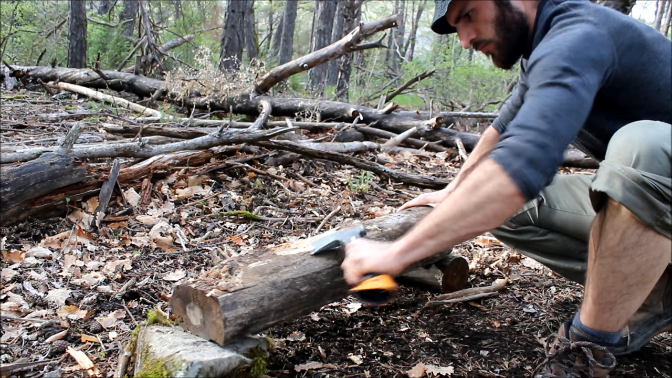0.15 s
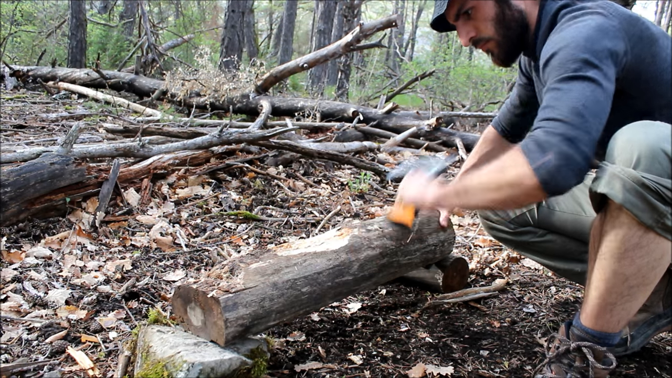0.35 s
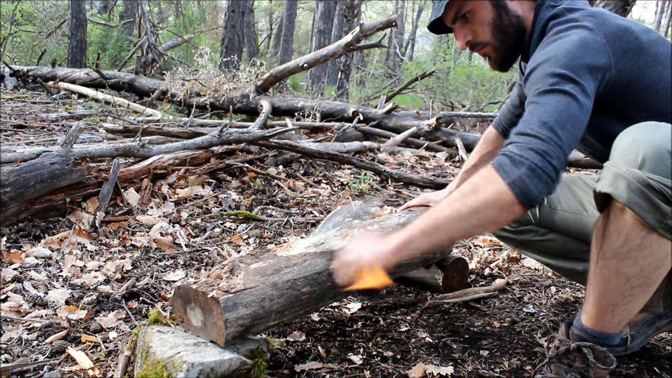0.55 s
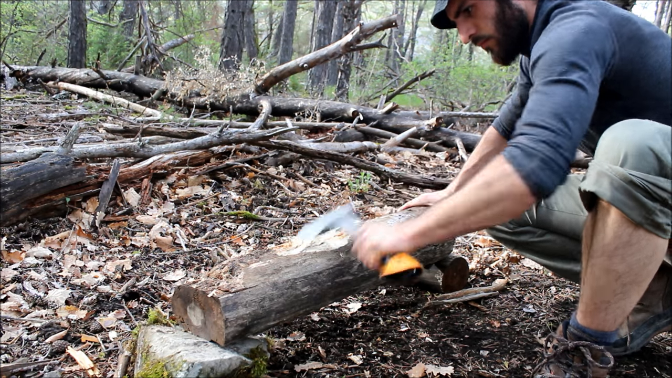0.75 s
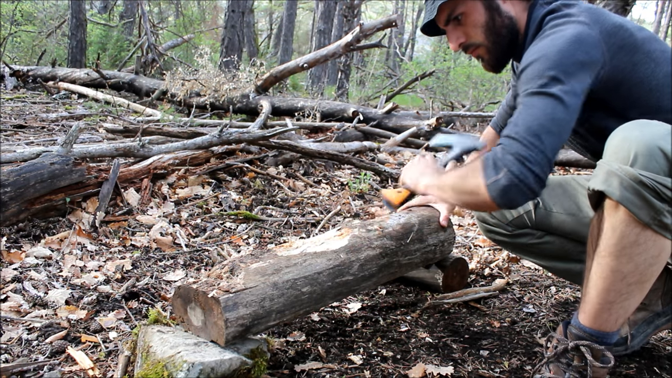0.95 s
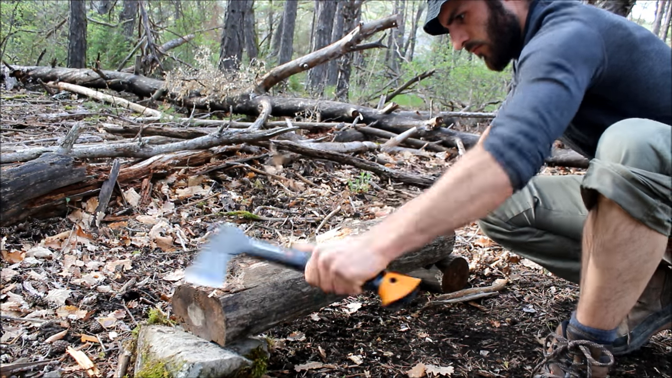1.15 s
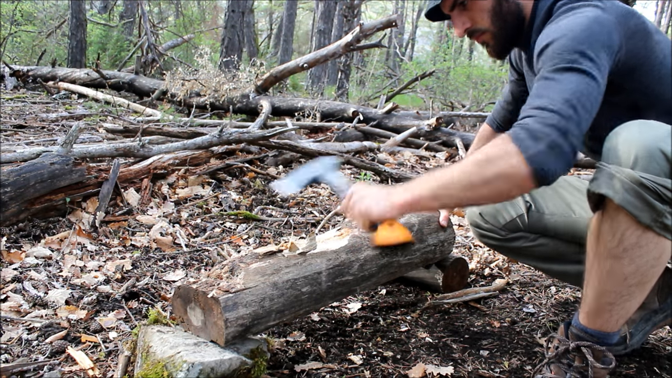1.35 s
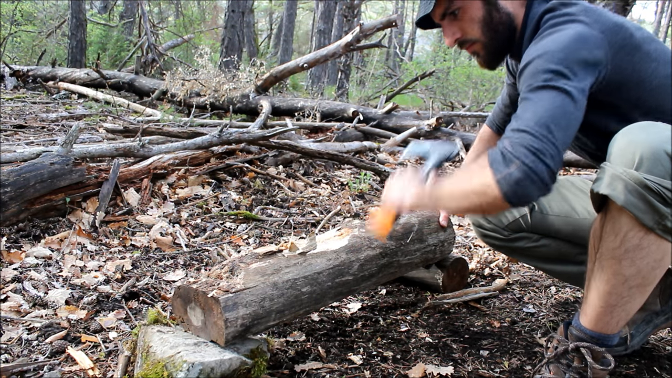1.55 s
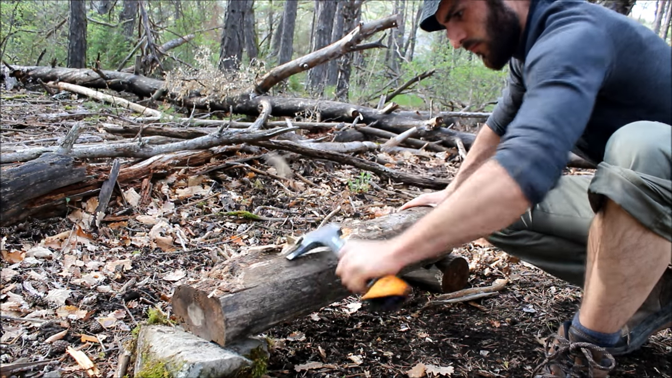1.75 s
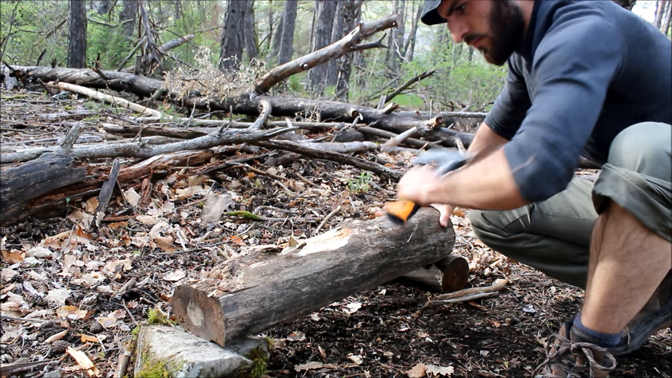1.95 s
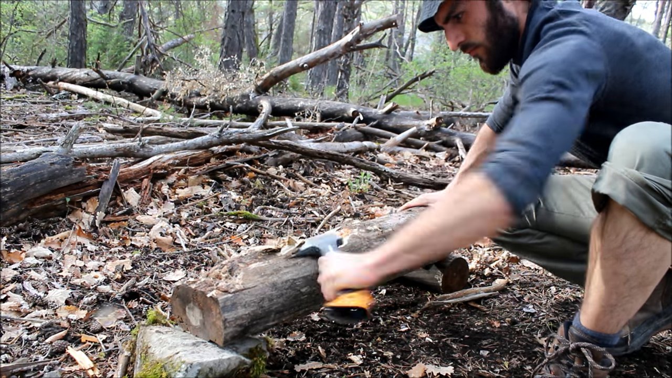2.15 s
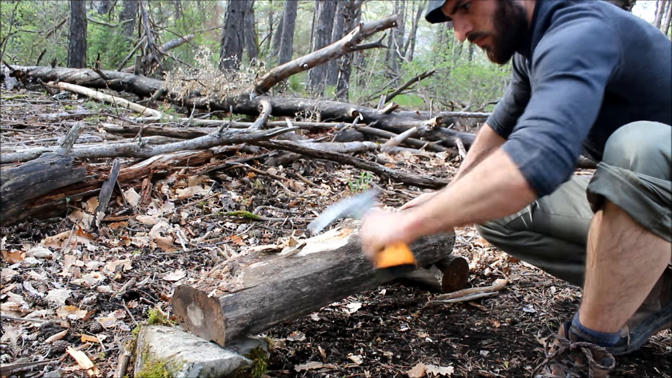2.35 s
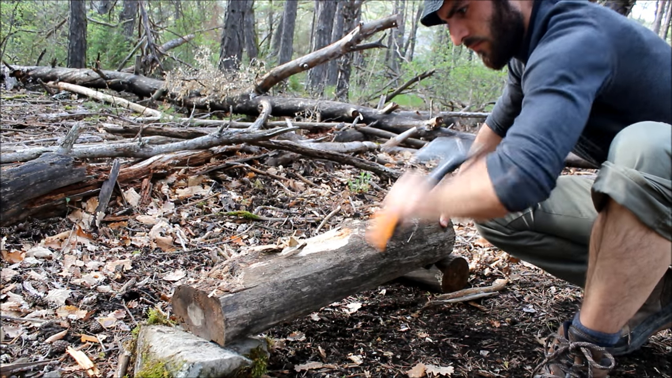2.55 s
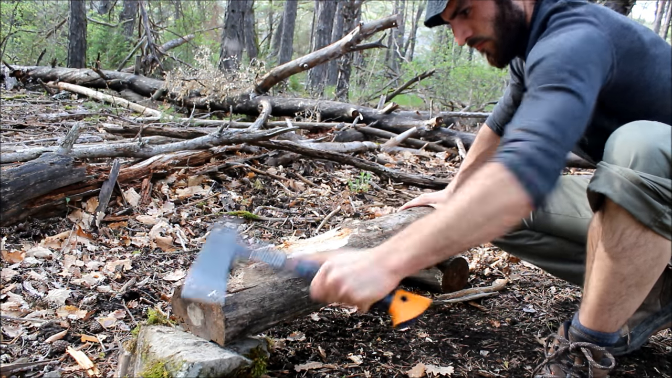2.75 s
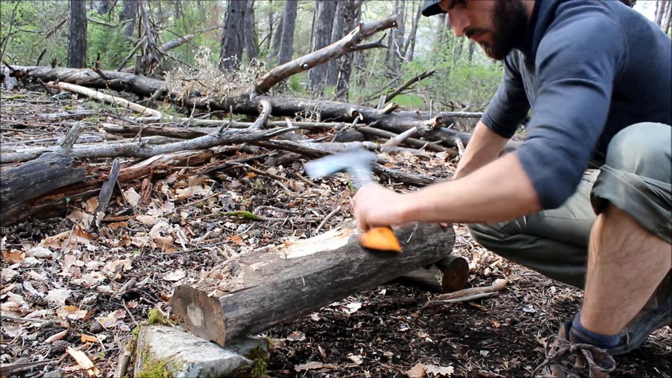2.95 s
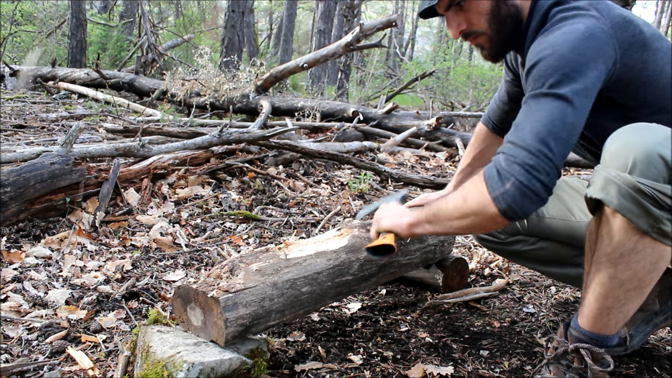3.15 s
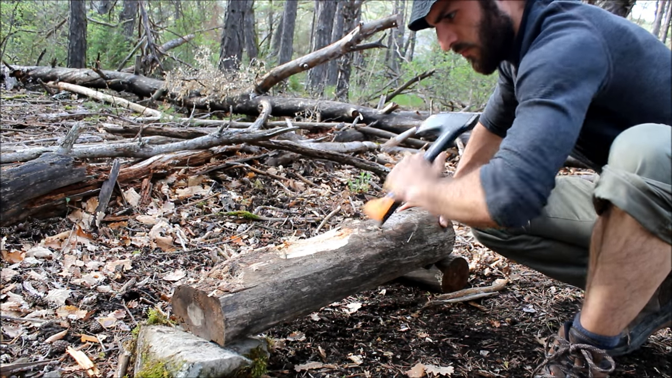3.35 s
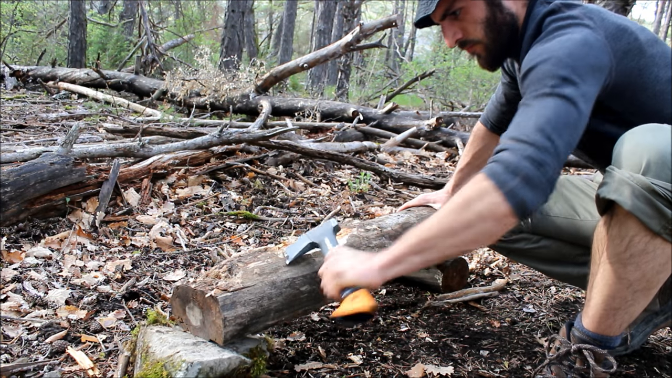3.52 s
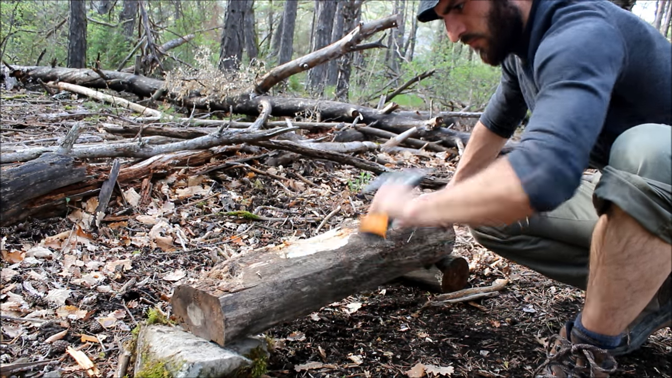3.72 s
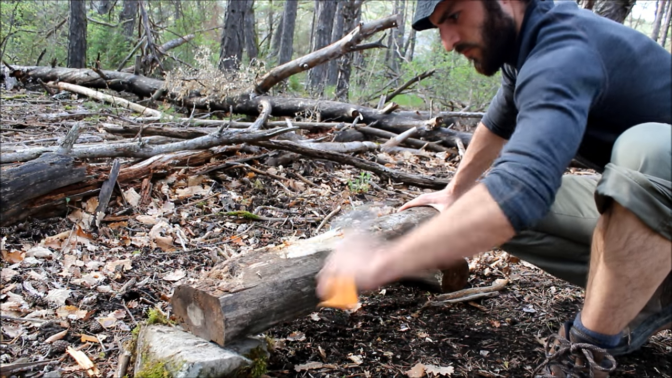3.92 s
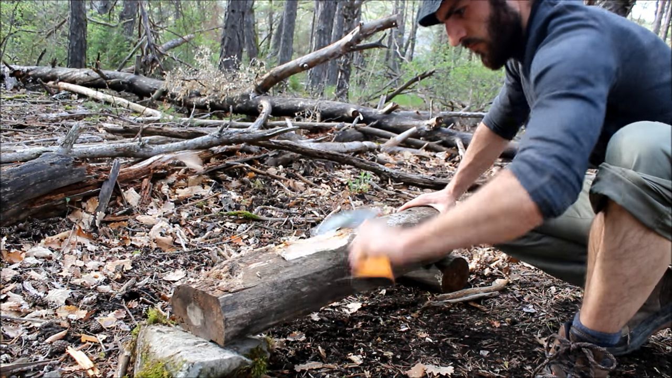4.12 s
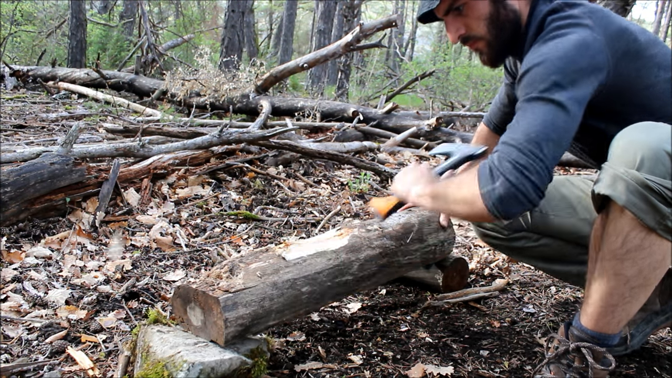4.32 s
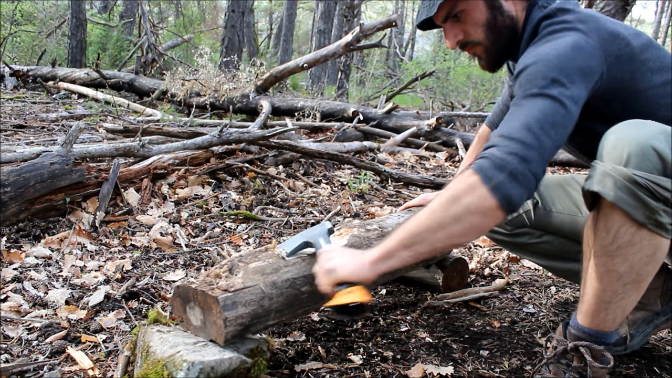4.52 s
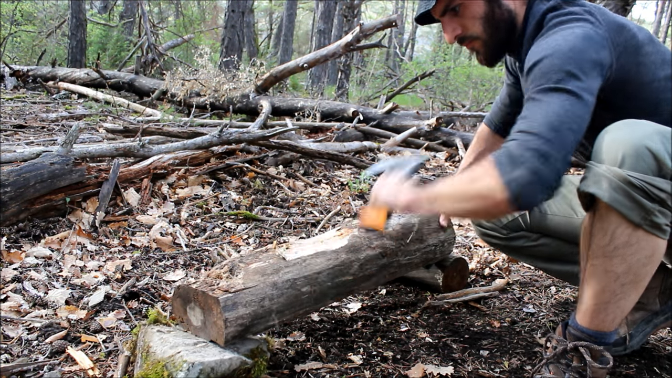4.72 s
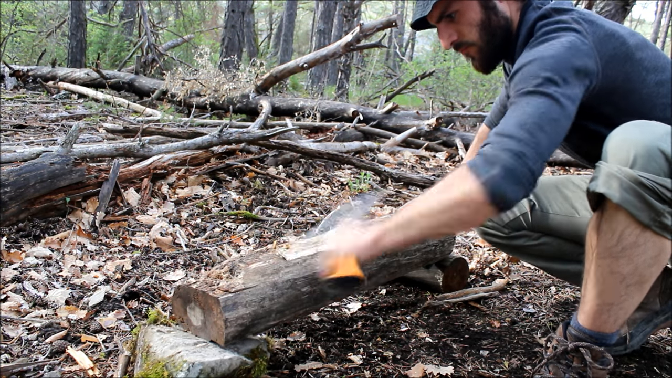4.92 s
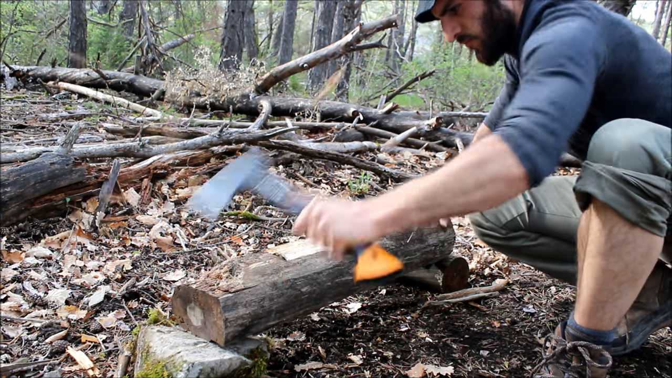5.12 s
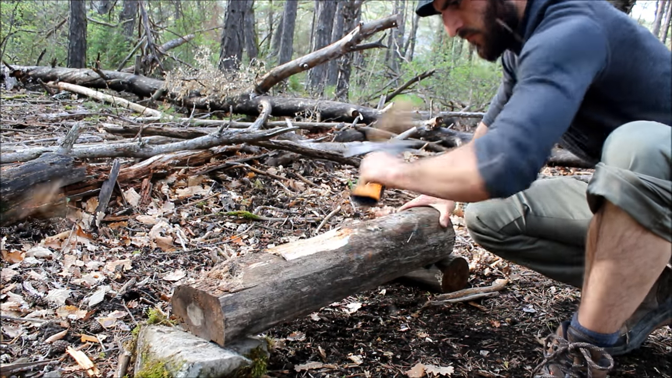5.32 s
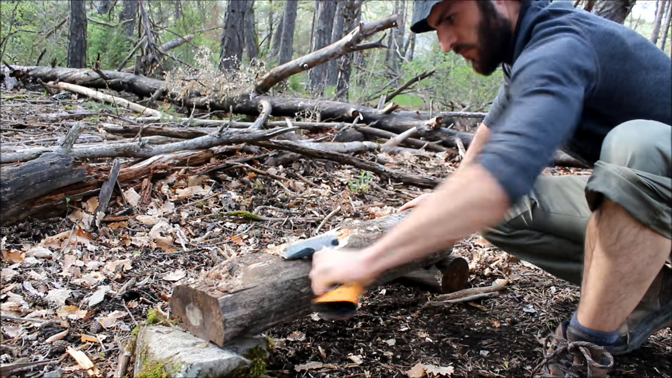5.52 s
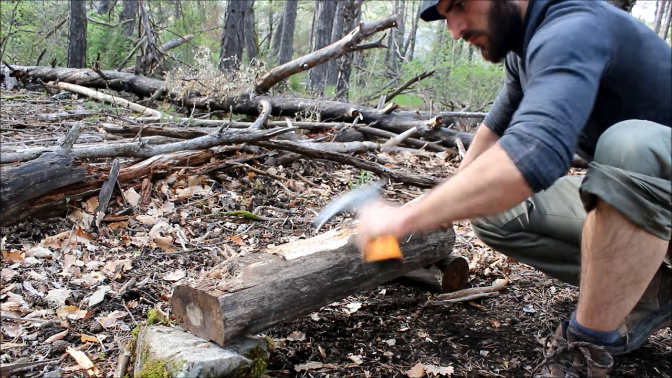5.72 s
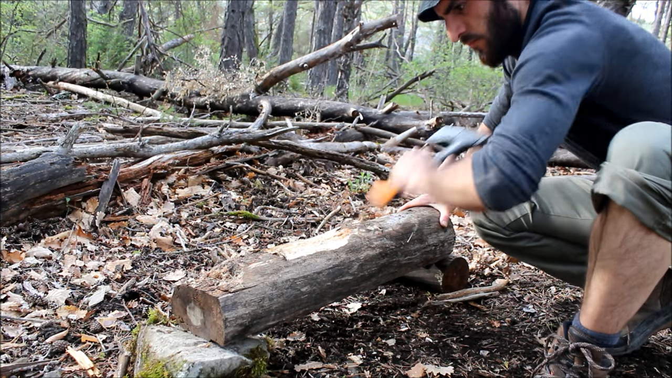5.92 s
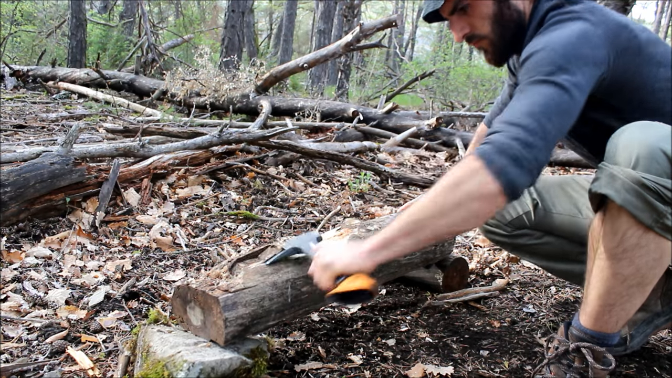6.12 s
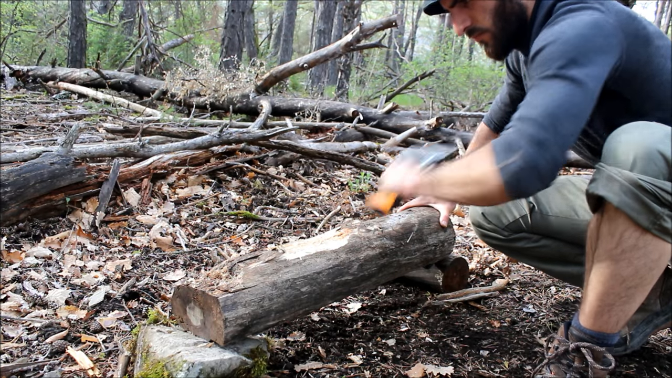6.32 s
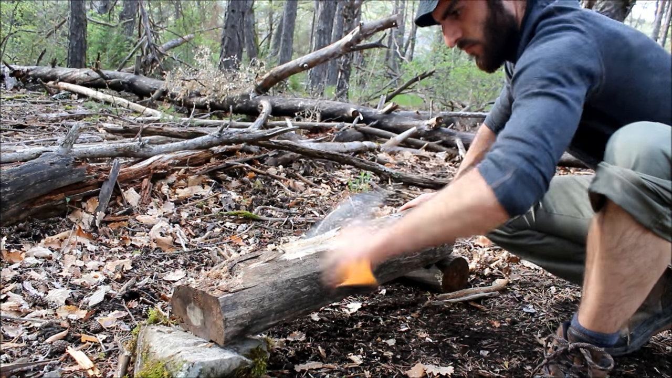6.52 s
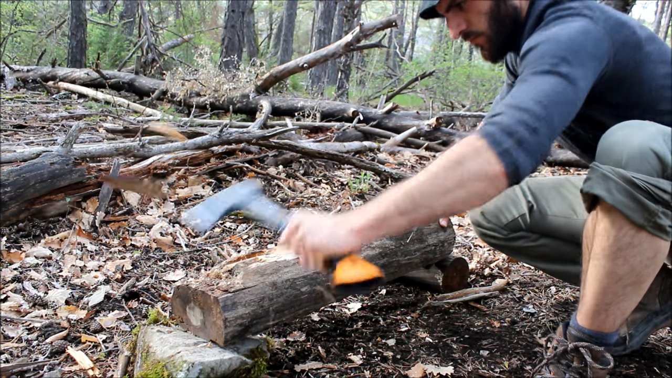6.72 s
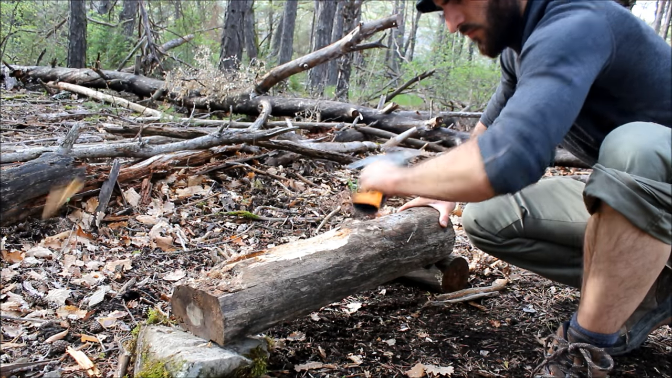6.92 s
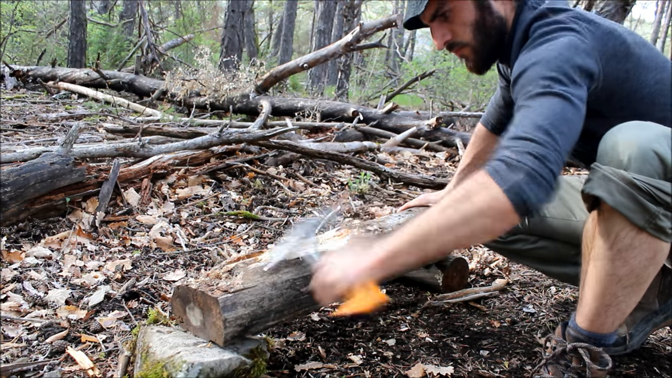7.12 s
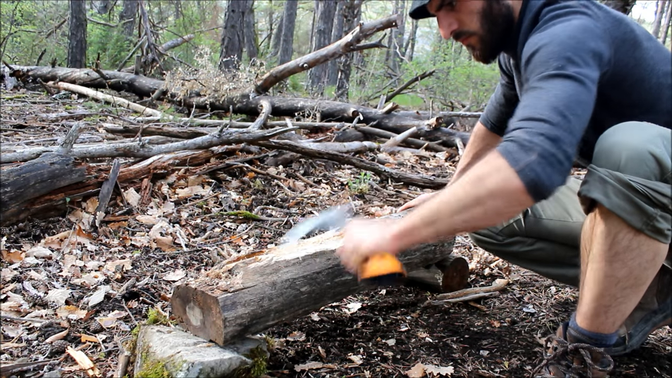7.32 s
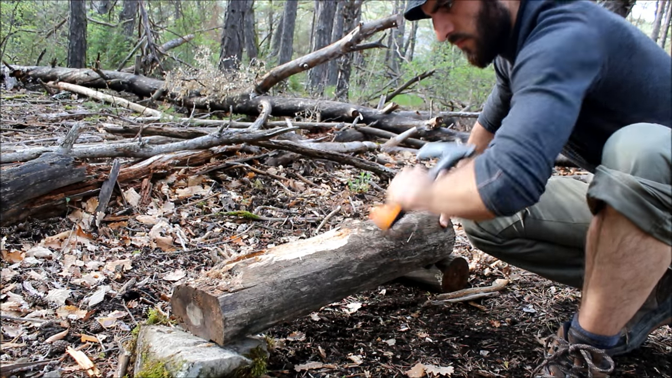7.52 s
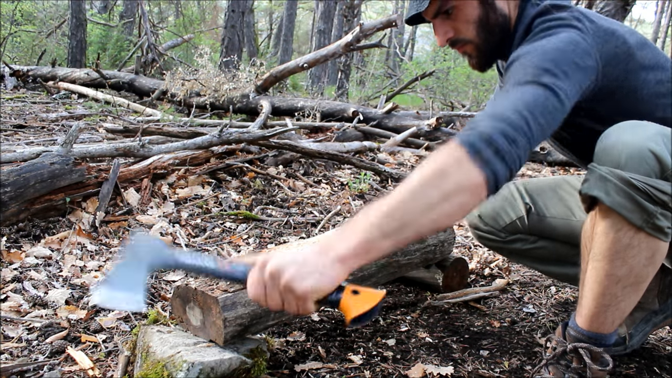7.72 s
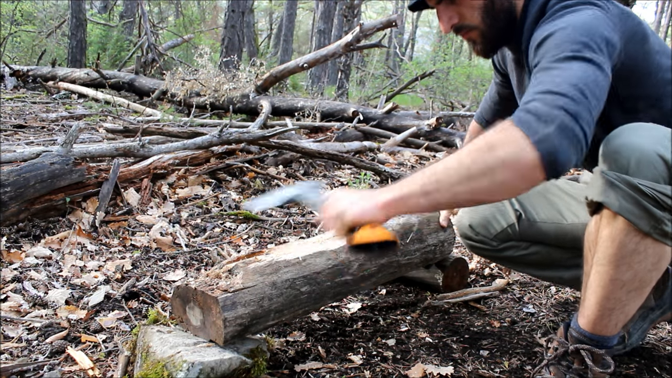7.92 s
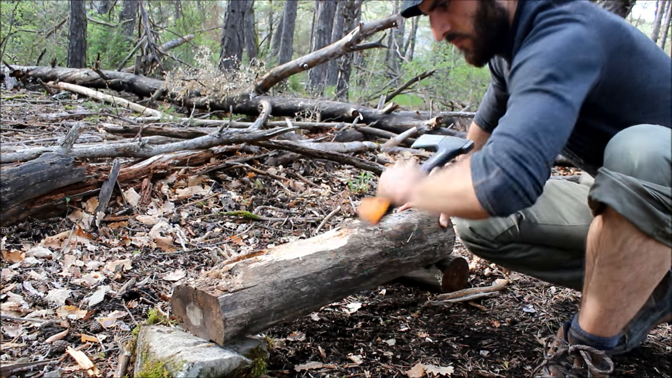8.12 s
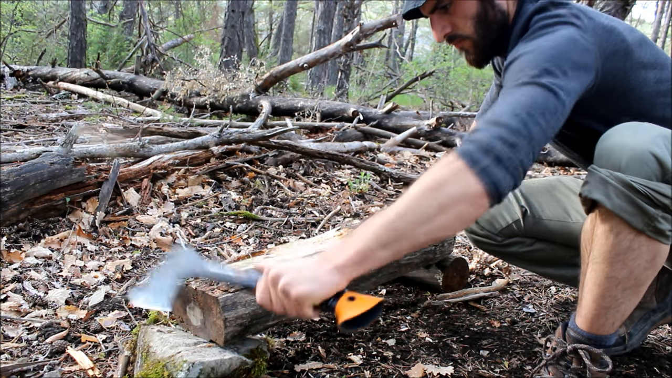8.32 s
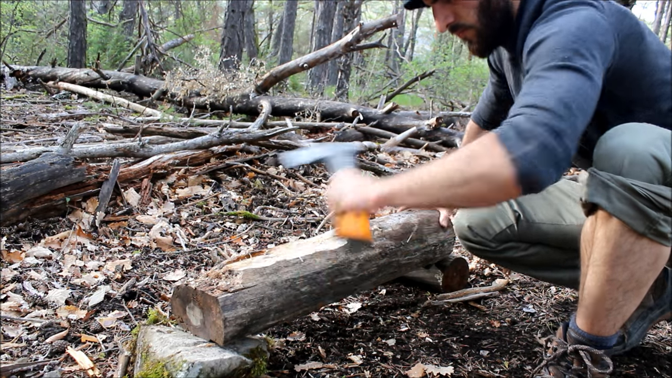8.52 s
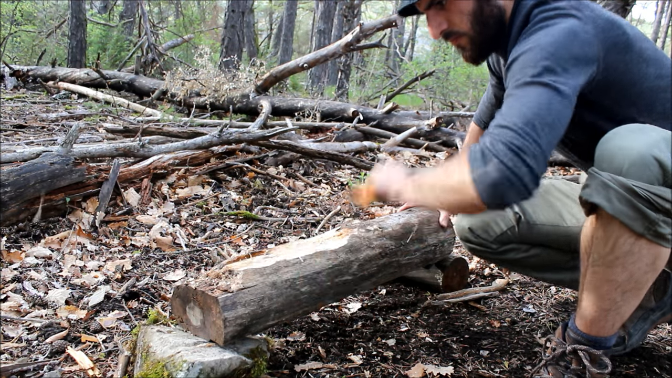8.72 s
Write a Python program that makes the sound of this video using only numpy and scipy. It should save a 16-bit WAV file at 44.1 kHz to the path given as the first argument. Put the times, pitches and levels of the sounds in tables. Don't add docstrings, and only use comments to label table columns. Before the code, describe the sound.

Outdoors in a wood, light wind bumps softly on a nearby microphone while a hatchet pares a log. Sixteen sharp, clipped knocks follow at roughly half-second spacing, some slightly doubled as the edge rebites. Short hollow wood tones and scattered tree echoes trail them. Chips tick, ping and rustle in dry leaves, busiest near three, five and a half and seven seconds.

```python
import sys
import numpy as np
from scipy import signal
from scipy.fft import rfft, irfft
from scipy.io import wavfile
from scipy.ndimage import uniform_filter1d

SR = 44100
rng = np.random.default_rng(int(sys.argv[2]) if len(sys.argv) > 2 else 0)


def to_wav(sig):
    pcm = np.clip(np.atleast_2d(sig), -1, 1) * 32767
    pcm = np.round(pcm).astype(np.int16)
    wavfile.write(sys.argv[1], SR, pcm.T)


def gain_from_db(level_db):
    decades = np.asarray(level_db, float) / 20
    return 10 ** decades


N = 386316

# start in seconds, strength in dB, knock in Hz,
# pitch as the edge bites in Hz, long log ring in dB.
BLOWS = [(0.1264, 11.5, 560, 1200, -24.5), (0.6091, 4.5, 676, 1170, -37), (1.1146, 7, 570, 1260, -36),
         (1.6845, 13, 670, 1140, -23), (2.182, 9.5, 717, 1460, -48), (2.6713, 11.5, 600, 1220, -26.5),
         (3.5087, -1, 420, 1050, -23.5), (3.9735, 1.5, 642, 1060, -27.5), (4.4757, -6, 900, 1150, -28.5),
         (4.9739, 5, 560, 1250, -24.5), (5.5428, 9, 620, 1150, -25.5), (6.0595, 8, 720, 1170, -29),
         (6.5763, 6.5, 653.5, 1210, -29.5), (7.1672, -8, 500, 800, -29.5), (7.6579, 14.5, 570, 1400, -20),
         (8.2736, -3, 410, 520, -24.5)]
# fibre tear in dB, tear t60 in seconds, steel ring in dB, # thump of the log
# in dB, further log modes in dB.
CUTS = [(-8.5, .033, -15.5, -21, 7), (-5, .05, -10, -17, 4), (-12, .07, -8, -18, 0.5),
        (-14, .07, -28, -16, 9.5), (-7.5, .045, -3.5, -20, 10), (-9.5, .065, -20.5, -11.5, 11),
        (-8.5, .04, -4, -4, 7.5), (-14, .1, -13, -12, 3.5), (-3, .032, -14, -4, 7), (-3, .06, -12, -14, 3),
        (-8, .046, -21, -10, 8), (-14, .1, -28, -7, 11), (-19, .14, -24, -14, 5.5),
        (-6.5, .033, -12, -8, -3), (-19, .07, -29, -6, 14), (-12.5, .052, -34.5, -5, 3)]
STEEL_HZ = 3093


def rms_one(x):
    return x / np.sqrt(np.mean(x ** 2) + 1e-20)


def coloured(x, spectrum):
    hz = np.maximum(np.arange(len(x) // 2 + 1) * SR / len(x), 1)
    points = np.array(spectrum)
    gain = gain_from_db(np.interp(np.log(hz), np.log(points[:, 0]), points[:, 1]))
    return rms_one(irfft(rfft(x) * gain, len(x)))


def crackle(size, per_s, spread_db):
    out = np.zeros(size)
    at = rng.integers(0, size, round(size * per_s / SR))
    uneven = gain_from_db(spread_db * np.minimum(rng.exponential(1, len(at)), 4))
    out[at] = uneven * rng.standard_normal(len(at))
    return out


def sine(hz, t):
    return np.sin(2 * np.pi * hz * t)


def dying(t, t60, rise_s):
    return (1 - np.exp(-t / rise_s)) * gain_from_db(-60 * t / np.maximum(t60, .002))


def add(out, s, piece):
    i = round(s * SR)
    out[i:i + len(piece)] += piece[:N - i]


def wind():
    # time in seconds, level in dB.
    wind_level = [(0.0, -77), (0.27, -71), (4.42, -77.5), (6.0, -70.5), (6.95, -79.5), (7.73, -74),
                  (8.76, -84)]
    # centre in seconds, peak in dB.
    puffs = [(0.203, -53), (1.274, -60), (1.321, -41), (1.412, -45.5), (1.646, -54), (2.872, -59),
             (3.583, -42), (4.439, -54.5), (4.551, -52), (5.245, -60), (5.259, -51.5), (5.483, -66),
             (5.504, -51.5), (5.628, -48), (6.16, -66), (7.62, -67), (7.743, -54), (8.243, -61.5)]
    s, db = np.transpose(wind_level)
    lumps = coloured(rng.standard_normal(N), [(4, 17.5), (14, 10.5), (40, -36.5)])
    rumble = coloured(rng.standard_normal(N), [(14, -42.5), (45, 9.0), (80, 1), (160, -2), (400, -37)])
    out = gain_from_db(np.interp(np.arange(N) / SR, s, db) + 2.5 * lumps) * rumble
    t = np.arange(-.025, .025, 1 / SR)
    thump = np.sin(2 * np.pi * 85 * t + .4) * np.exp(-(t / .007) ** 2)
    for s, db in puffs:
        add(out, s - .025, gain_from_db(db) * thump)
    return out


def air():
    # frequency in Hz, level in dB per Hz.
    hush = [(35, -22.5), (60, -2), (118, 5.5), (1020, 1), (4960, -8.5), (7720, -12), (14500, -19.5),
            (15500, -14.5)]
    return gain_from_db(-60.5) * coloured(rng.standard_normal(N), hush)


def whine():
    # frequency in Hz, peak in dB.
    tones = [
        (15734.3, -79.5),
        (15747.3, -84),
    ]
    return sum(gain_from_db(db) * sine(hz, np.arange(N) / SR) for hz, db in tones)


def knock(t, db, hz, bite_hz):
    pitch = hz + (bite_hz - hz) * np.exp(-t / 0.0022)
    return np.sin(2 * np.pi * np.cumsum(pitch) / SR) * dying(t, .025 * gain_from_db(-.3 * db), 0.0006)


def log_modes(t, thump_db, further_db):
    # frequency in Hz, t60 in seconds.
    low_modes = [
        (190, 0.055),
        (392, 0.062),
        (588, 0.047),
    ]
    # frequency in Hz, level in dB, t60 in seconds.
    further_modes = [(130, -29.5, 0.06), (733.3, -7, 0.018), (941, -20, 0.022), (1141, -17, 0.018),
                     (1371, -9.5, 0.022), (1562, -9.5, 0.014), (1943, -12.5, 0.018), (2567, -30, 0.03)]
    low_dbs = -12.5 + .4 * thump_db, thump_db, -12.5 + .65 * further_db
    out = np.zeros(len(t))
    for db, (hz, t60) in zip(low_dbs, low_modes):
        out += gain_from_db(db) * sine(hz, t) * dying(t, t60, 0.0013)
    for hz, db, t60 in further_modes:
        level_luck, pitch_luck = rng.standard_normal(2)
        tone = sine(hz * (1 + .02 * pitch_luck), t)
        out += gain_from_db(further_db + db + 2 * level_luck) * tone * dying(t, t60, .0006)
    return out


def tearing_fibres():
    # frequency in Hz, level in dB per Hz.
    tear_colour = [(180, -26), (300, 11.5), (1370, 3.5), (2000, 2.5), (4000, 4), (6460, -6), (7500, -3),
                   (15500, -26.5)]
    fibres = coloured(crackle(N, per_s=9000, spread_db=3.0), tear_colour)
    coarse = signal.sosfilt(signal.butter(2, 2500, fs=SR, output="sos"), fibres)
    return coarse, fibres - coarse


def blows():
    # rise in seconds, one-sided push of air (+ outward).
    entries = [(.0003, .08), (.0002, .05), (.0002, .02), (.0002, .07), (.0001, -.005), (.0002, -.01),
               (.0004, .04), (.0004, .005), (.0005, .02), (.0002, .002), (.0002, .05), (.0001, .12),
               (.0002, .03), (.0003, -.015), (.0002, .05), (.0004, .025)]
    # start in seconds, level in dB, pitch in Hz, t60 in seconds.
    rebites = [(0.1313, -12, 560, .03), (1.689, -6, 600, .02), (2.6755, -4, 580, .025),
               (3.5107, 4, 540, .02), (4.4772, -3, 1300, .012), (4.4792, 0.1, 400, .035),
               (6.0641, 1, 780, .015), (7.1695, -9, 420, .02), (7.1762, -17, 600, .05),
               (7.6627, -7, 560, .025), (7.6668, -9, 800, .012), (7.684, -16, 440, .045),
               (7.688, -21, 620, .04), (8.2806, -3, 1200, .01), (8.2832, -3, 440, .02),
               (8.2875, -7, 540, .012)]
    out, t = np.zeros(N), np.arange(SR // 2) / SR
    fibres = tearing_fibres()
    for (s, db, hz, bite_hz, ring_db), cut, (rise_s, push) in zip(BLOWS, CUTS, entries):
        tear_db, tear_t60, steel_db, thump_db, further_db = cut
        steel = gain_from_db(steel_db) * sine(STEEL_HZ, t) * dying(t, 0.015, .0003)
        strike = gain_from_db(db) * (knock(t, db, hz, bite_hz) + steel)
        coarse, fine = (np.resize(part[round(s * SR):], len(t)) for part in fibres)
        tear = coarse * dying(t, tear_t60, .0015) + fine * dying(t, .7 * tear_t60, 0.00073)
        ring = gain_from_db(ring_db) * sine(316.5, t) * dying(t, 0.34, 0.00067)
        entry = (1 - np.exp(-t / rise_s)) ** 2
        add(out, s, entry * (strike + log_modes(t, thump_db, further_db) + gain_from_db(tear_db) * tear + ring))
        add(out, s, push * np.exp(-((t - .007) / .003) ** 2))
    for s, db, hz, t60 in rebites:
        add(out, s, gain_from_db(db) * sine(hz, t) * dying(t, t60, .0005))
    return out


def sent_to_trunks():
    # colour in Hz, level in dB, treble in dB.
    echoes = [(1120, -43, -66.5), (1100, -49, -59.5), (1050, -53, -59), (1200, -44.5, -63),
              (1350, -43, -60.5), (1150, -49.5, -56), (950, -51.5, -64.5), (950, -49.5, -62.5),
              (1020, -50, -62.5), (950, -50.5, -60), (1080, -45.5, -57), (950, -46.5, -58),
              (1000, -52, -64), (600, -54, -64), (1330, -44, -70), (650, -48.5, -68)]
    body, tick, t = np.zeros(N), np.zeros(N), np.arange(SR // 2) / SR
    for (s, *_), (_, _, steel_db, _, _), (hz, db, treble_db) in zip(BLOWS, CUTS, echoes):
        pulse = sine(hz, t) * (dying(t, 0.0038, .0001) + .04 * dying(t, .02, .0001))
        steel = gain_from_db(steel_db) * sine(STEEL_HZ, t) * dying(t, .007, .0001)
        add(body, s, gain_from_db(db + 11) * (pulse + .25 * steel))
        add(tick, s, gain_from_db(treble_db + 22) * np.array([1, .6, .25]))
    return body, tick


def trunks(x):
    # frequency in Hz, level in dB, t60 in seconds.
    trunk_bands = [(200, -10, 0.17), (500, 3, 0.39), (1100, 2.5, 0.55), (2000, 2.5, 0.54), (3000, 5.5, .58),
                   (4500, 3, .6), (8440, 6, 0.23), (14800, -3, .3)]
    t, echo = np.arange(SR) / SR, np.zeros(SR)
    points = np.array(trunk_bands)
    for hz in 160 * 2 ** np.arange(0, 6.6, .5):
        db, t60 = (np.interp(np.log(hz), np.log(points[:, 0]), points[:, k]) for k in (1, 2))
        half_octave = signal.butter(2, [hz / 2 ** .25, hz * 2 ** .25], "band", fs=SR, output="sos")
        band = signal.sosfilt(half_octave, rng.standard_normal(SR))
        swell = 1 - np.exp(-t / 0.0059)
        echo += gain_from_db(db) * band * dying(t, t60, .03) * swell
    grain = rms_one(uniform_filter1d(rng.standard_normal(SR), round(.004 * SR)))
    echo *= gain_from_db(2.2 * grain)
    return signal.fftconvolve(x, echo / np.sqrt(np.sum(echo ** 2)))[:N] * 10


def snaps():
    # start in seconds, peak in dB, centre in Hz, t60 in seconds.
    large_chips = [(0.2095, -29, 2700, 0.0032), (0.415, -28, 4200, 0.006), (1.4343, -28, 2700, 0.007),
                   (1.6246, -36, 2500, 0.009), (1.8356, -31, 3000, 0.0049), (1.9934, -14.5, 3300, 0.012),
                   (2.0259, -26.5, 2200, 0.0051), (2.1368, -27, 2900, 0.017), (2.371, -31, 4100, 0.012),
                   (2.8715, -14.5, 3500, 0.012), (2.8844, -21, 6000, 0.012), (2.9122, -22, 4600, 0.004),
                   (2.9576, -20, 1600, 0.019), (2.978, -21.5, 3000, 0.0053), (2.9885, -26, 2200, 0.006),
                   (3.0976, -28.5, 2700, 0.01), (3.2143, -29, 2800, 0.009), (3.408, -26.5, 5500, 0.0053),
                   (5.349, -32.5, 3000, 0.0057), (5.486, -30, 3900, 0.0044), (5.5, -28.5, 4500, 0.0098),
                   (5.5069, -27.5, 4000, 0.016), (5.7151, -29, 2900, 0.014), (6.7832, -31, 3500, 0.011),
                   (6.8497, -21, 3100, 0.012), (6.8911, -14, 3000, 0.0028), (6.9813, -26, 1700, 0.006),
                   (7.0474, -27, 3300, 0.006), (7.1468, -32.5, 4400, 0.013), (7.3136, -31, 5500, 0.006)]
    # start in seconds, peak in dB, centre in Hz,
    # t60 in seconds.
    splinters = [(0.6154, -15, 6000, 0.0091), (1.1236, -6, 4500, 0.007), (1.1368, -8, 4400, 0.006),
                 (1.1405, -16, 1800, 0.0068), (1.6912, -13, 5560, 0.014), (2.1905, -12, 5100, 0.0049),
                 (2.68, -11, 4000, .016), (2.6921, -6.5, 4200, 0.006), (4.985, -13, 4200, .016),
                 (5.0008, -20, 5900, 0.004), (5.571, -36, 2600, 0.0075), (6.0668, -11, 4200, 0.012),
                 (6.0752, -16, 9000, .008), (6.586, -4, 2600, 0.0029), (6.5897, -15, 8000, .006),
                 (6.5925, -13, 3500, .012), (6.602, -14.5, 2600, 0.012), (7.681, -31, 3500, 0.008),
                 (8.2795, -6, 1600, 0.011)]
    # start in seconds, peak in dB, centre in Hz.
    small_chips = [(0.287, -32.5, 3900), (0.8084, -33, 3100), (1.4724, -35, 3900), (1.5406, -36.5, 2900),
                   (1.6431, -36, 3600), (1.863, -41, 3700), (1.9106, -39, 3300), (2.5814, -42.5, 5500),
                   (2.926, -32, 3300), (3.0233, -34.5, 3400), (3.044, -36.5, 2700), (3.4753, -39.5, 4200),
                   (4.429, -34.5, 3700), (5.1942, -35.5, 4300), (5.2485, -36.5, 3000), (5.359, -29, 2800),
                   (5.3993, -34.5, 2900), (5.443, -34, 2300), (5.521, -41, 2000), (5.8955, -39.5, 4000),
                   (6.241, -38, 4000), (6.495, -39.5, 4900), (6.767, -39, 3900), (7.0062, -31, 2400),
                   (7.0306, -32.5, 3700), (7.1093, -35, 2200), (7.2292, -36, 4300), (7.4304, -42, 3700),
                   (8.5583, -33, 3700), (8.5889, -39, 3500)]
    # start in seconds, peak in dB, centre in Hz.
    crumbs = [(1.3679, -50, 2900), (1.4136, -47, 4300), (1.4491, -46, 4000), (1.5117, -40, 4700),
              (1.5319, -49, 4100), (1.5655, -50, 6100), (1.5988, -47, 4900), (1.6296, -40, 3200),
              (1.8299, -33, 3600), (2.0607, -46, 6100), (2.5457, -44, 7000), (2.6359, -51, 6100),
              (2.8932, -27, 7200), (2.8977, -27, 4000), (2.9406, -40, 4300), (2.9729, -25, 2800),
              (3.0038, -35, 2700), (3.0763, -40, 3100), (3.0838, -35, 3900), (3.1086, -35, 3100),
              (3.1315, -35, 3200), (3.1634, -46, 5300), (3.2301, -44, 4000), (3.2642, -45, 4200),
              (3.3388, -47, 5500), (3.3915, -43, 6200), (4.8303, -53, 3400), (4.8377, -47, 3400),
              (5.2723, -48, 4600), (5.3449, -39, 4700), (5.3787, -36, 4600), (5.3921, -39, 5500),
              (5.4059, -42, 6400), (5.4195, -34, 5200), (5.435, -44, 4500), (5.4629, -36, 5000),
              (5.5833, -36, 2000), (5.6035, -35, 4600), (5.7783, -47, 5300), (5.8168, -37, 2700),
              (6.0038, -50, 2600), (6.3004, -47, 4500), (6.608, -23, 3000), (6.6799, -40, 2900),
              (6.7453, -43, 4900), (6.798, -41, 4900), (6.8647, -12, 3600), (6.8726, -13, 3900),
              (7.0802, -34, 3200), (7.3186, -43, 4700), (7.3381, -39, 3400), (7.3734, -49, 6300),
              (7.4898, -50, 4100), (7.9776, -43, 5300), (8.1849, -52, 5200), (8.3506, -46, 1900),
              (8.5827, -45, 4900), (8.6385, -48, 6900), (8.6557, -49, 3900), (8.7142, -44, 5700)]
    # start in seconds, peak in dB.
    touches = [
        (3.5058, -24),
        (4.473, -22.5),
        (7.164, -28),
    ]
    rows = list(splinters) + list(large_chips)
    rows += [(s, db, 1800, .012) for s, db in touches]
    rows += [(s, db, hz, .005) for s, db, hz in small_chips]
    rows += [(s, db, hz, .003) for s, db, hz in crumbs]
    out, t = np.zeros(N), np.arange(SR // 16) / SR
    for s, db, hz, t60 in rows:
        spit = rng.standard_normal(len(t)) * dying(t, 1.8 * t60, .0002)
        burst = signal.lfilter(*signal.butter(1, hz / 1.6, "high", fs=SR), spit)
        burst = signal.lfilter(*signal.butter(3, hz * 1.55, fs=SR), burst)
        ring = sine(.7 * hz, t) * dying(t, 16 / hz, .0003)
        add(out, s, gain_from_db(db) * (burst / np.max(np.abs(burst)) + gain_from_db(-6.5) * ring))
    return out


def solid_chips():
    # start in seconds, peak in dB, pitch in Hz.
    pings = [(1.5987, -48, 4500), (2.898, -36, 3700), (2.972, -26, 2600), (3.0624, -43, 4300),
             (3.085, -40, 3300), (3.1085, -41, 2600), (3.129, -35, 2900), (3.2998, -48, 2900),
             (5.365, -35, 2400), (5.463, -40, 2500), (5.8156, -39, 2600), (6.012, -47, 2400),
             (6.7445, -47, 5500), (6.9312, -36, 2300), (7.022, -36, 1700), (7.1313, -40, 3000),
             (7.3375, -39, 3000), (7.4536, -48, 1700)]
    # start in seconds, peak in dB, pitch in Hz.
    thuds = [(1.992, -36.5, 512), (2.085, -46, 600), (2.871, -30, 420), (3.408, -41, 283),
             (4.827, -45, 415), (5.36, -42.5, 338), (5.425, -45, 468), (5.712, -39.5, 302),
             (5.983, -42.5, 396), (7.034, -36, 298), (7.455, -52, 300)]
    out, t = np.zeros(N), np.arange(SR // 16) / SR
    for s, db, hz in pings:
        add(out, s, gain_from_db(db) * sine(hz, t) * dying(t, .012, .0003))
    for s, db, hz in thuds:
        add(out, s, gain_from_db(db) * sine(hz, t) * dying(t, 0.047, 0.00036))
    return out


def bird():
    # time in seconds, pitch in Hz, level in dB.
    notes_sung = [
        [(0.335, 4180, -73), (0.362, 4380, -68), (0.395, 4200, -72)],
        [(0.535, 4340, -68), (0.565, 4241, -62), (0.59, 4327, -72)],
    ]
    out = np.zeros(N)
    for rows in notes_sung:
        s, hz, db = np.transpose(rows)
        t = np.arange(s[0], s[-1], 1 / SR)
        tone = np.sin(2 * np.pi * np.cumsum(np.interp(t, s, hz)) / SR)
        level = np.sqrt(2) * gain_from_db(np.interp(t, s, db))
        add(out, s[0], level * tone * signal.windows.tukey(len(t), .4))
    return out


def rustles():
    # loudest moment in seconds, level in dB, seconds to swell by 20 dB,
    # seconds to fade by 20 dB.
    slides = [(2.872, -28, .006, .051), (2.983, -33, .025, .025), (3.126, -52, .4, .05),
              (5.352, -45, .008, .11), (5.508, -45, .07, .026), (5.725, -51, .3, .01),
              (6.762, -50, .005, .11), (6.861, -23, .005, .04), (6.866, -23, .012, .025),
              (6.895, -38, .005, .035), (6.98, -54, .02, .2), (7.068, -32.5, .06, .008),
              (7.032, -42, .006, .08), (7.08, -43, .01, .07)]
    # frequency in Hz, level in dB per Hz.
    leaves = [(180, -38), (300, -10), (696, -4), (1910, 4), (4720, -1), (8140, -12), (15500, -30.5)]
    t, gain, cracks = np.arange(N) / SR, np.zeros(N), np.zeros(N)
    for s, db, swell_s, fade_s in slides:
        gain += gain_from_db(db - 20 * np.maximum((s - t) / swell_s, (t - s) / fade_s))
    leaf_hz, leaf_db = np.transpose(leaves)
    for hz in np.geomspace(500, 13000, 12):
        radius, angle = gain_from_db(-60 * hz / (9 * SR)), 2 * np.pi * hz / SR
        fine = rms_one(crackle(N, per_s=1800, spread_db=3.0))
        large = rms_one(crackle(N, per_s=90, spread_db=3.0))
        resonator = [1, -2 * radius * np.cos(angle), radius ** 2]
        rings = rms_one(signal.lfilter([1, 0, -1], resonator, fine + gain_from_db(-14) * large))
        cracks += gain_from_db(np.interp(np.log(hz), np.log(leaf_hz), leaf_db)) * np.sqrt(hz) * rings
    return gain * gain_from_db(-2.5) * rms_one(cracks)


def scene():
    chips = snaps() + solid_chips() + rustles()
    body, tick = sent_to_trunks()
    echo = trunks(body) + trunks(tick + gain_from_db(-50) * chips)
    return (wind() + air() + blows() + echo + chips + bird())[None]


def roll_off(x):
    return signal.sosfilt(signal.butter(12, 17150, fs=SR, output="sos"), x)


def record(dry):
    clipped = np.clip(dry, -.505, .505)
    top_cut = signal.ellip(7, .2, 45, 15950, fs=SR, output="sos")
    return roll_off(signal.sosfilt(top_cut, clipped + whine()))


dry = scene()
out = record(dry)
to_wav(out)
```